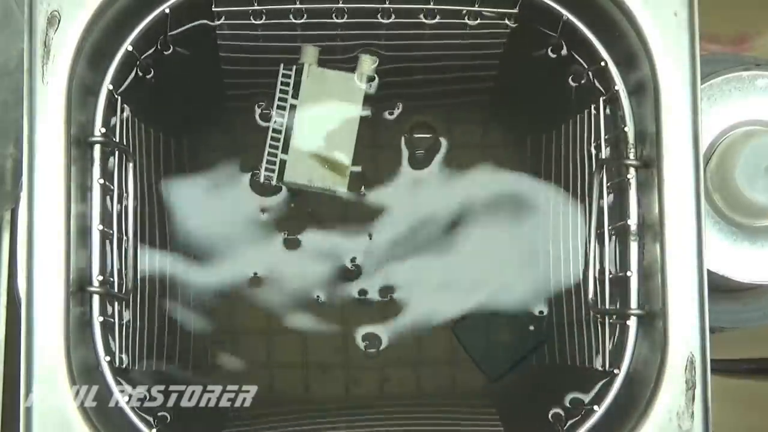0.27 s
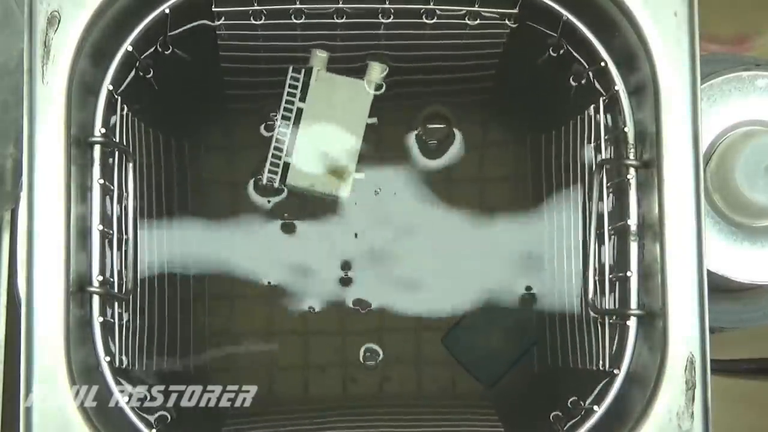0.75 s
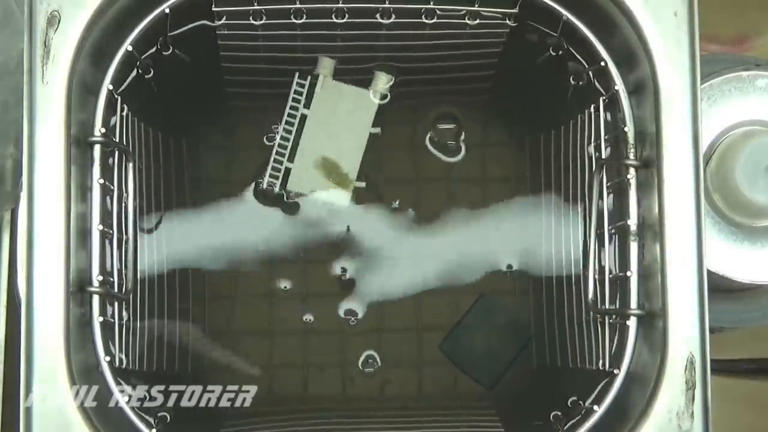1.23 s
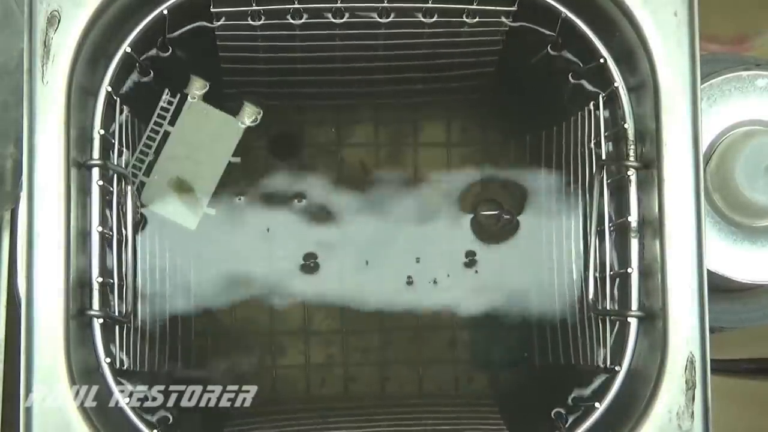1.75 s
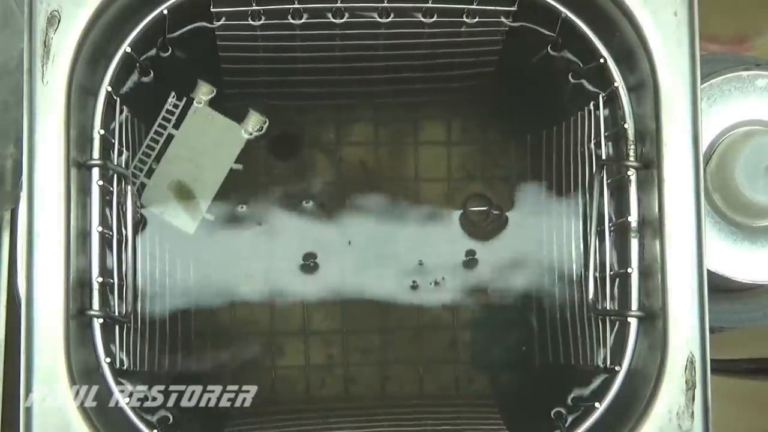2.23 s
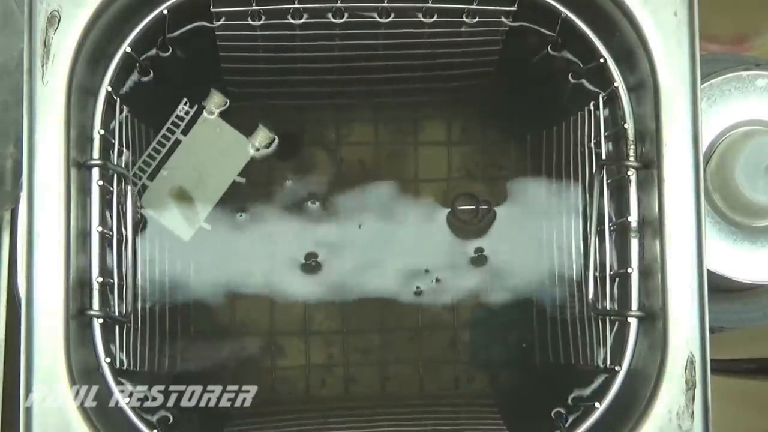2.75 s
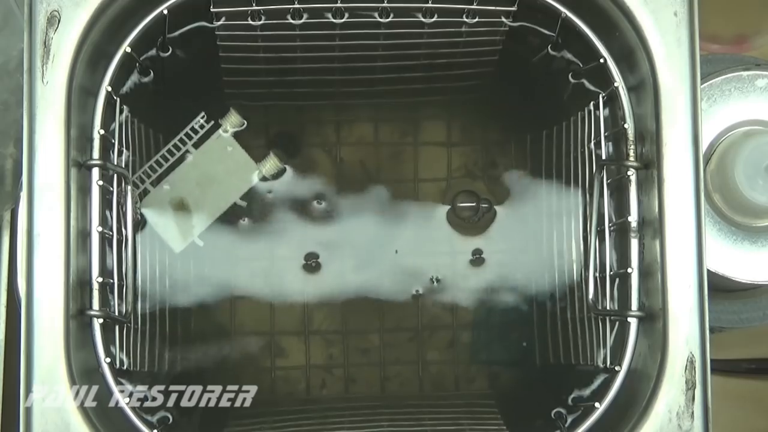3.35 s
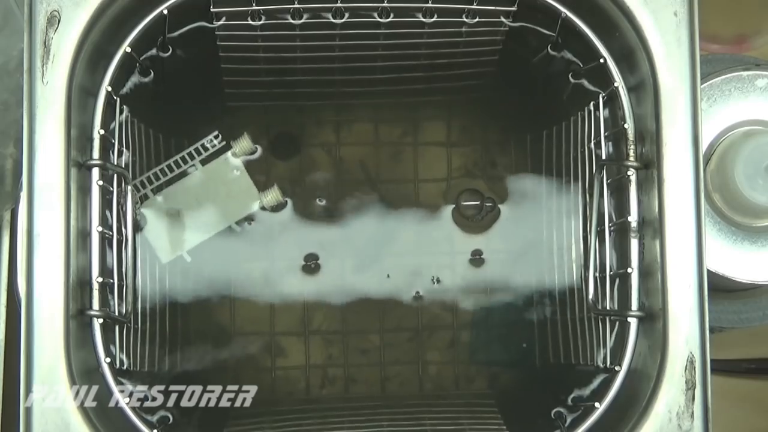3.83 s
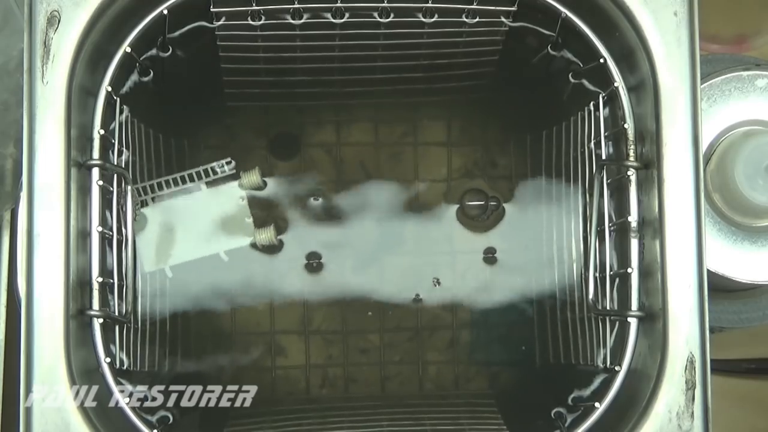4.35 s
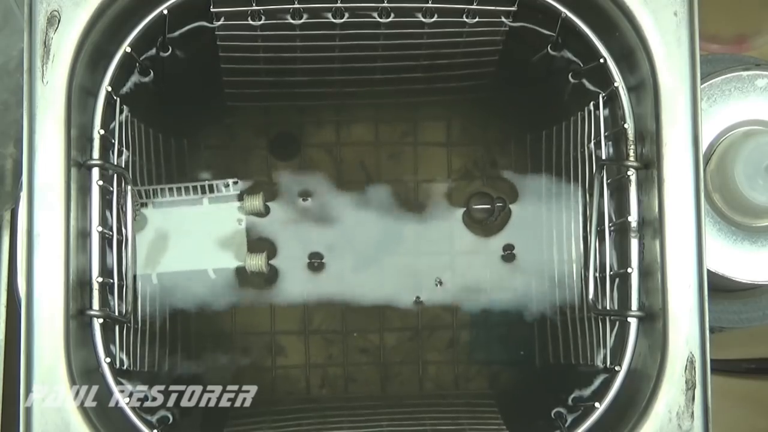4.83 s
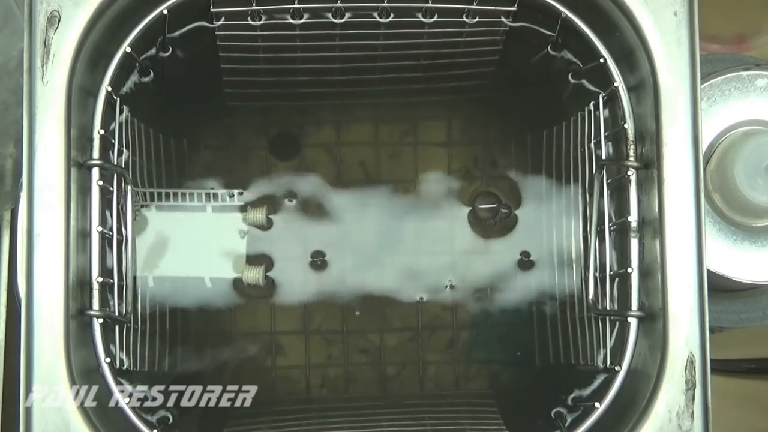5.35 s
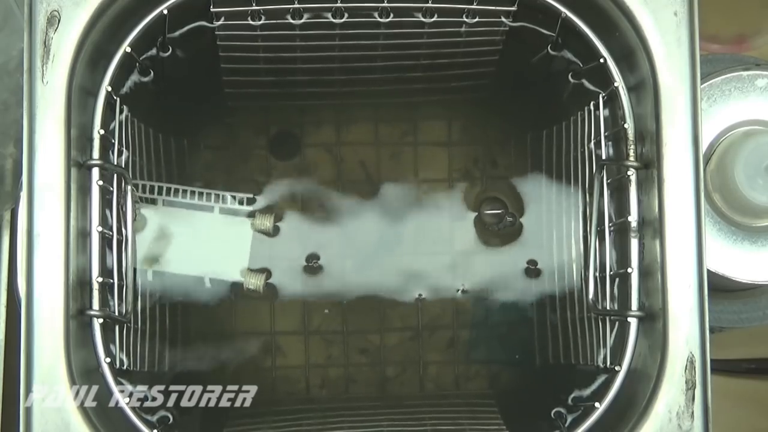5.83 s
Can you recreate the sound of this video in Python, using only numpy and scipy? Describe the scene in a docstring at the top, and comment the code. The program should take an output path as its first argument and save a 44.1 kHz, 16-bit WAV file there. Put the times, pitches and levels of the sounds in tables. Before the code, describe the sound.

First only faint room noise and light knocks of handling. Then a small steel tank of liquid bursts into ultrasonic cleaning, its bubbles fizzing as a sharp, metallic treble hiss that flutters a hundred times a second. A shrill whistle rides on it, dipping and surging, with weak electrical buzz and irregular soft pops below. The cleaner keeps going without stopping, heard indoors from very near through a phone.

```python
"""A quiet room, hum beneath: filtered noise. Soft knocks and faint ticks, decaying noise, come before the start.
A small ultrasonic bath close to a phone is then switched on; its drive swells twice per mains cycle.
Bubbles collapse in dense random clicks that ring the steel tank's modes, and a short tone whistles at each crest.
The mains buzz, a set of harmonics, wavers throughout, over a scatter of low pops made of short pressure pulses."""
import sys
import numpy as np
from scipy import signal
from scipy.fft import rfft, irfft
from scipy.io import wavfile
from scipy.ndimage import uniform_filter1d

SR = 44100
rng = np.random.default_rng(int(sys.argv[2]) if len(sys.argv) > 2 else 0)


def master_out(mix):
    """Clip the mix to full scale and print it as 16-bit PCM to the path in sys.argv[1]."""
    frames = np.transpose(np.atleast_2d(mix))
    ceiling = np.clip(frames, -1, 1)
    pcm = np.round(ceiling * 32767).astype(np.int16)
    wavfile.write(sys.argv[1], SR, pcm)


N = 268128
T = np.arange(N) / SR  # s
HZ = np.fft.rfftfreq(N, 1 / SR)
RIPPLE_HZ, CREST_S = 99.985, 1.5059  # swell rate of the drive, time of one crest


def undb(db):
    """Decibel law: the amplitude ratio for a level in dB."""
    return 10 ** (np.asarray(db) / 20)


def level(x, db):
    """Root-mean-square scaling: x brought to a level in dB rms."""
    return x * undb(db) / np.sqrt(np.mean(x ** 2))


def shape(points):
    """Spectral envelope: gain through (Hz, dB) points, straight in dB over log frequency."""
    hz, db = np.transpose(points)
    return undb(np.interp(np.log(HZ + 1), np.log(hz), db))


def ring(modes):
    """Modal superposition: summed second-order resonances (Hz, width Hz, dB), neighbours in opposite phase."""
    response = 0
    for k, (f, width, db) in enumerate(modes):
        damping = 1j * HZ * width
        response = response + (-1) ** k * undb(db) * damping / (f * f - HZ ** 2 + damping)
    return response


def through(x, gain):
    """Linear filtering: the spectrum of x times a gain over frequency."""
    return irfft(rfft(x) * gain, N)


def noise():
    """White noise: equal mean power at every frequency."""
    return rng.standard_normal(N)


def walk(rate):
    """Slow random modulation: levels held 1 / rate s and slewed twice; spread near 1."""
    k = int(SR / rate)
    held = np.repeat(rng.standard_normal(N // k + 1), k)
    return 1.62 * uniform_filter1d(uniform_filter1d(held, k), k)[:N]


def burst(s, db, t60, rise_s):
    """Exponential decay: an envelope that rises fast at s and falls 60 dB in t60 seconds."""
    t = np.clip(T - s, 0, None)
    return undb(db - 60 * t / t60) * (1 - np.exp(-t / rise_s))


# Colour of the room noise. Each row: frequency in Hz, relative density in dB per Hz.
ROOM_COLOUR = [(15, -48), (25, -12), (91, -3.5), (333, -1.5), (727, -7.5), (1030, -14), (1310, -17.5),
               (1720, -17), (2020, -21), (2510, -19.5), (15700, -21.5)]
# Distant machinery. Each row: frequency in Hz, width in Hz, relative gain in dB.
HUM_MODES = [(48.6, 6, -6.5), (96.6, 8, -0.5), (267, 30, -8)]
# Furniture and room modes, rung by background and knocks. Each row: frequency in Hz, width in Hz, gain in dB.
FURNITURE_MODES = [(850, 200, -3), (1046, 40, 5.5), (1587, 83, -2.5), (1840, 110, -3), (2500, 61, -7),
                   (2890, 45, -5), (3180, 88, -15.5), (3730, 120, -9), (5000, 300, -20.5)]


def room():
    """Stationary noise: a room background, partly coloured by the modes, over a low hum."""
    plain = through(noise() * undb(.5 * walk(6)), shape(ROOM_COLOUR))
    coloured = through(noise(), ring(FURNITURE_MODES))
    hum = through(noise(), ring(HUM_MODES))
    return level(plain, -70.5) + level(coloured, -78) + level(hum, -79)


# Faint ticks of a hand at the switch. Each row: start in seconds, centre in Hz, width in Hz,
# envelope level in dB, decay t60 in seconds.
HAND_TICKS = [(.391, 12200, 6040, -61.5, 0.035), (.862, 10900, 7000, -71, 0.054),
              (1.315, 7900, 3000, -73, 0.19)]


def ticks():
    """Band-limited transients: short puffs of treble noise."""
    total = 0
    for s, hz, width, db, t60 in HAND_TICKS:
        treble = through(noise(), ring([(hz, width, 0)]) ** 2)
        total = total + burst(s, db, t60, rise_s=0.0012) * level(treble, 0)
    return total


# Soft knocks. Each row: start in seconds, envelope level in dB, decay t60 in seconds,
# dull body relative to crack in dB.
SOFT_KNOCKS = [(0.005, -63.5, 0.2, 7), (0.204, -53.5, 0.15, -2.5), (0.868, -50.5, 0.21, -9.5),
               (1.36, -64.5, 0.42, -8)]


def knocks():
    """Modal excitation: a noisy decay in the struck thing's modes, a bright crack over a dull body."""
    modes = ring(FURNITURE_MODES)
    bright = HZ / (HZ + 2500) / (1 + (HZ / 5500) ** 6)
    crack = level(through(noise(), (modes + .12) * bright), -6)
    body = level(through(noise(), modes / (1 + (HZ / 1900) ** 4)), -6)
    total = 0
    for s, db, t60, body_db in SOFT_KNOCKS:
        total = total + burst(s, db, t60, rise_s=0.0038) * (crack + undb(body_db) * body)
    return total


# The loudest low pops. Each row: time in seconds, pulse peak in dB before the high-pass.
LOUD_POPS = [(1.6488, -48), (2.6742, -50.5), (3.094, -48), (3.313, -51), (3.4271, -52), (3.6505, -49),
             (3.75, -46.5), (3.9829, -50), (4.122, -51), (4.214, -49.5), (4.3005, -50), (4.634, -48.5),
             (5.2355, -50)]


def pops(rise_s=0.00014, fall_s=0.00065):
    """Impulse response: pressure pulses of either sign, the listed ones and a scatter of weaker ones."""
    weak = rng.random(N) < 40 / SR  # about 40 per second
    kicks = weak * undb(-56.5 + 1.8 * noise())
    for s, db in LOUD_POPS:
        kicks[int(s * SR)] += undb(db)
    kicks *= rng.choice([-1, 1], N)
    t = np.arange(300) / SR
    pulse = np.exp(-t / fall_s) - np.exp(-t / rise_s)
    train = np.convolve(kicks, pulse / pulse.max())[:N]
    return through(train, 1j * HZ / (60 + 1j * HZ))  # first-order high-pass at 60 Hz


# Mains buzz. Each row: multiple of the ripple rate, level at the high point in dB rms, high point in seconds.
BUZZ_LINES = [(2, -83, 2.3), (3, -78, 2.6), (4, -76.5, 1.4), (5, -82, 4.9), (6, -77.5, 4), (8, -80, 4.1),
              (9, -75.5, 3.7), (10, -75.5, 6), (13, -80, 2.1), (16, -77.5, 5.7)]
# Air resonance that the bath excites. Each row: frequency in Hz, width in Hz, level in dB rms.
AIR_MODE = [(1042, 28, -73)]
BUZZ_SWELL_DB_PER_S = 2.5  # rise before the high point, fall after it
BUZZ_WANDER_DB, BUZZ_WANDER_PER_S = 1.25, 1.13  # each harmonic fades and returns on its own


def buzz(cycle):
    """Harmonic series: mains lines that swell, wander and flutter, and an air resonance fed by noise."""
    lines = 0
    for order, top_db, top_s in BUZZ_LINES:
        swell = top_db - BUZZ_SWELL_DB_PER_S * np.abs(T - top_s)
        wander = BUZZ_WANDER_DB * walk(BUZZ_WANDER_PER_S)
        flutter = 1.8 * walk(9)
        phase = 2 * np.pi * round(order) * cycle + .8 * walk(5)
        lines = lines + np.sqrt(2) * undb(swell + wander + flutter) * np.sin(phase)
    air = through(noise() * undb(1.2 * walk(25)), ring(AIR_MODE))
    return lines + level(air, AIR_MODE[0][2])


# Pitch of the whistle. Each row: time in seconds, frequency in Hz.
WHISTLE_PITCH = [(1.45, 12050), (5.33, 12080), (5.45, 12700), (6.08, 11950)]


def whistle(cycle, share=.3):
    """Amplitude gating: a short tone at each crest; size, pitch and timing differ from crest to crest."""
    turn = np.floor(cycle + .5)  # number of the nearest crest
    draws = rng.standard_normal((N // 400 + 2, 4))
    timing, pitch, phase, size = draws[(turn - turn[0]).astype(int)].T
    since_crest = cycle - turn  # cycles
    # the burst lasts the given share of a ripple cycle
    window = np.cos(np.pi * np.clip((since_crest - 0.014 * timing) / share, -.5, .5))
    hz = np.interp(T, *np.transpose(WHISTLE_PITCH)) + 100 * pitch
    tone = np.sin(2 * np.pi * hz * since_crest / RIPPLE_HZ + np.pi * phase)
    return level(window * tone * undb(4.2 * np.clip(size, -3, 1.6)), 0)


def collapses(cycle, spread_db, ripple_db, lag):
    """Cavitation: dense bubble clicks of uneven but bounded size, stronger just after the drive's crest."""
    strength = np.minimum(rng.exponential(size=N), 5)
    ripple = ripple_db * np.cos(2 * np.pi * (cycle - lag))  # lag in cycles
    size = undb(spread_db * strength + ripple + 0.67 * walk(60))
    return level(noise() * size, 0)


# Colour of the collapses heard from the liquid. Each row: frequency in Hz, relative density in dB per Hz.
LIQUID_COLOUR = [(400, -39), (700, -25.5), (1200, -26.5), (2100, -26.5), (4200, -22), (7000, -19),
                 (8800, -11.5), (9600, -5.5), (10600, -15), (11600, -12.5), (13800, -7.5), (14800, -4),
                 (15700, -4)]
# Tank modes. Each row: centre in Hz.
TANK_CENTRES = [4180, 4790, 6420, 6700, 7490, 8130, 9240, 9945, 10290, 11000, 11330, 11800, 12235, 12670,
                12840, 13290, 13550, 14300, 14630, 14900, 15150, 15515, 15700]
# The same modes, in the same order. Each row: width in Hz, relative gain in dB.
TANK_WIDTHS = [(187, -22.5), (99, -20), (38, -15), (152, -18), (91, -12), (61, -9.5), (46.4, -3),
               (51.4, -8), (180, -4.5), (201, -11.5), (118, -8), (155, -5.5), (60, -4), (71.4, -3.5),
               (70, -3.5), (130, 1.5), (98, -8.5), (179, -3), (122, 3), (102, -3.5), (87, 0), (75, 1),
               (78, -5)]
HISS_DB = -36.5  # gain at 0 dB strength
HISS_FOLLOWS, TANK_FOLLOWS = 0.045, 0.15  # dB per dB of strength: all the hiss, the tank's ring on top
GROUP_SWELL_DB = 1.4


def fizz(cycle, strength_db):
    """Direct and resonant paths: collapses heard straight from the liquid and through the tank's modes."""
    clicks = collapses(cycle, spread_db=3.5, ripple_db=0.05, lag=0.17)
    # each click dies away in the liquid over a millisecond or two
    tail = np.exp(-np.arange(400) / SR / .0015) * rng.standard_normal(400)
    tail[0] = 5.5
    # the tail's own colour is divided out
    colour = shape(LIQUID_COLOUR) / np.abs(rfft(tail, N))
    broad = through(np.convolve(clicks, tail)[:N], colour)
    # the moving surface shifts the standing waves, so groups of modes swell on their own
    tank = [(hz, *mode) for hz, mode in zip(TANK_CENTRES, TANK_WIDTHS)]
    modes = 0
    for group in range(4):
        drive = collapses(cycle, spread_db=5.0, ripple_db=3.0, lag=0.095)
        drive = drive * undb(GROUP_SWELL_DB * walk(15))
        modes = modes + through(drive, ring(tank[group::4]))
    mix = level(broad, -4.5) + level(modes, -4) * undb(TANK_FOLLOWS * strength_db)
    return mix * undb(HISS_DB + HISS_FOLLOWS * strength_db)


def decorrelate(mid, side_points):
    """Stereo decorrelation: a phase-scrambled, shaped copy is added to one channel and taken from the other."""
    turns = 6 * uniform_filter1d(rng.standard_normal(len(HZ)), size=40)
    side = through(mid, shape(side_points) * np.exp(2j * np.pi * turns))
    return np.array([mid + side, mid - side])


# Strength of the cavitation, with lulls. Each row: time in seconds, strength in dB.
CAVITATION_STRENGTH = [(1.45, -7), (1.55, 1.5), (1.85, -2.5), (2.03, -12.5), (2.4, -7.5), (2.6, -7.5),
                       (2.68, 1), (2.98, 0), (3.2, -2), (3.3, -1), (3.43, 2), (3.63, -13), (3.8, -2.5),
                       (4.8, 3), (5.0, -8), (5.22, 2), (5.37, -1), (5.82, 1), (6.08, -5.5)]
# Stereo side level used for the background. Each row: frequency in Hz, side relative to mid in dB.
BACKGROUND_SIDE = [(60, -8.5), (110, -14), (200, -16.5), (380, -9), (700, -12), (1290, -28.5),
                   (2380, -28.5), (4400, -36), (8120, -11), (15000, 5)]
# Stereo side level used while the bath plays. Each row: frequency in Hz, side relative to mid in dB.
PLAYING_SIDE = [(60, -11), (110, -18), (200, -8.5), (380, -16), (700, -57), (1290, -56), (2380, -52),
                (4400, -44), (8120, -22), (15000, -24.5)]
START_S = 1.4478
WHISTLE_DB = -46.5  # level at 0 dB strength
SURGE_DB, SURGES_PER_S, SURGE_TOP = 3, 18, 1.  # short random runs: spread, rate, strongest in spreads


def scene():
    """Superposition: the bath, gated by its switch, added to the room, knocks and ticks."""
    cycle = (T - CREST_S) * RIPPLE_HZ
    on = np.clip((T - START_S) / .0015, 0, 1)
    surge_db = SURGE_DB * np.minimum(walk(SURGES_PER_S), SURGE_TOP)
    strength_db = np.interp(T, *np.transpose(CAVITATION_STRENGTH)) + surge_db
    # the whistle follows the strength in full
    whistling = whistle(cycle) * undb(WHISTLE_DB + strength_db)
    bath = fizz(cycle, strength_db) + whistling + buzz(cycle) + pops()
    background = room() + knocks() + ticks()
    return decorrelate(on * bath, PLAYING_SIDE) + decorrelate(background, BACKGROUND_SIDE)


def record(dry):
    """Band limitation: the phone cuts the top with a steep elliptic low-pass at 15720 Hz."""
    low_pass = signal.ellip(12, .3, 75, 15720, fs=SR, output="sos")
    return signal.sosfilt(low_pass, dry)


dry = scene()
out = record(dry)
master_out(out)
```